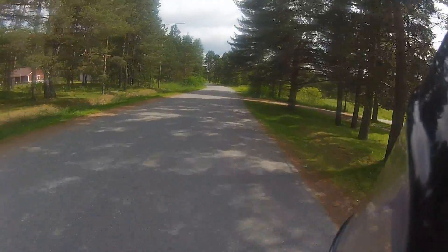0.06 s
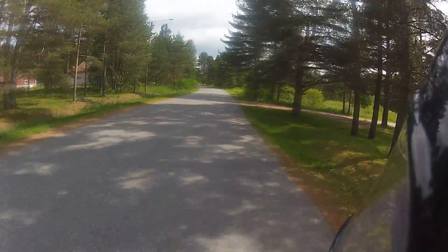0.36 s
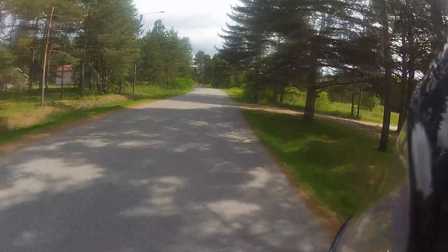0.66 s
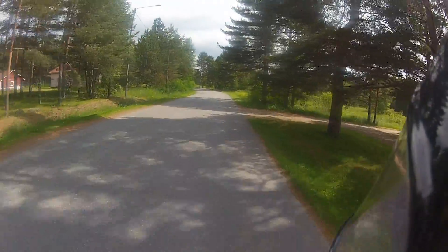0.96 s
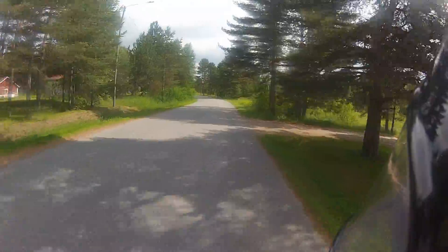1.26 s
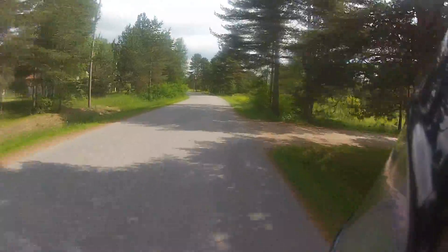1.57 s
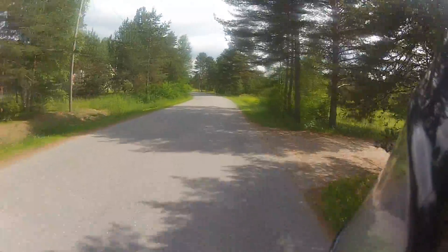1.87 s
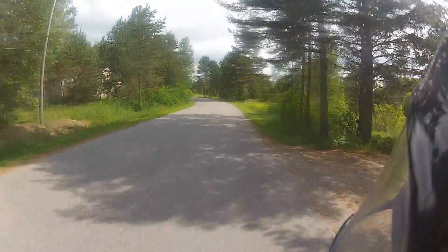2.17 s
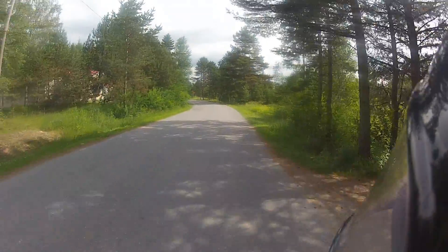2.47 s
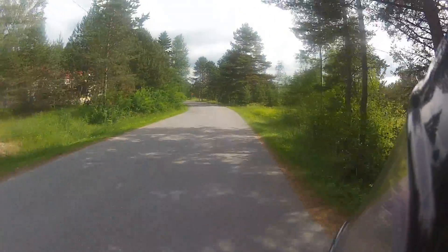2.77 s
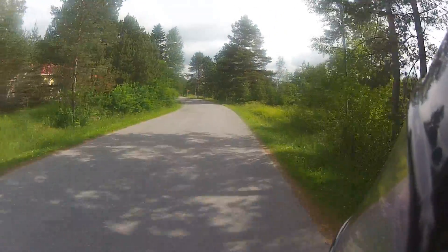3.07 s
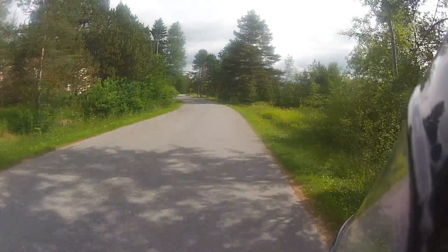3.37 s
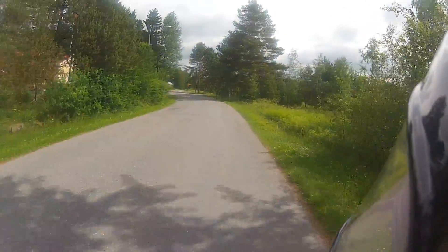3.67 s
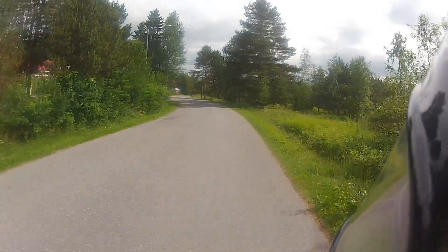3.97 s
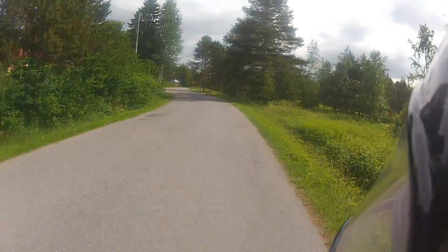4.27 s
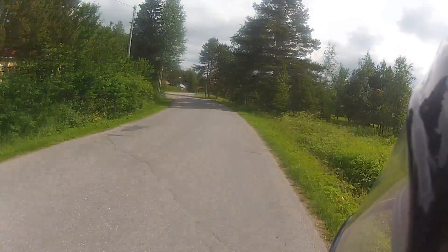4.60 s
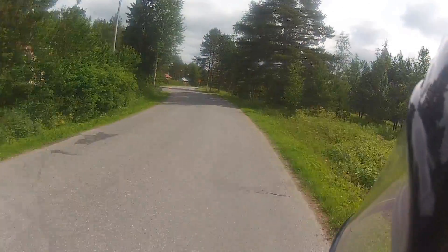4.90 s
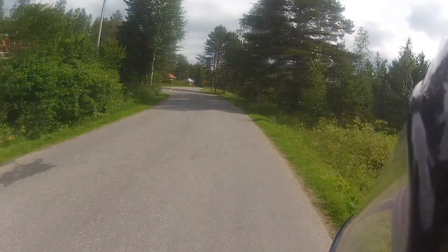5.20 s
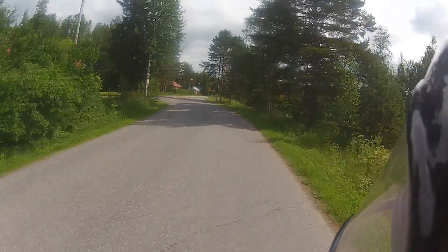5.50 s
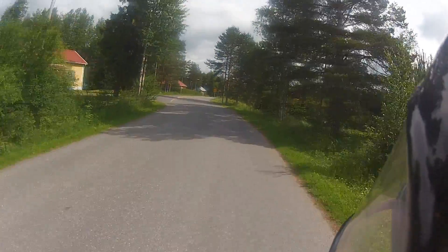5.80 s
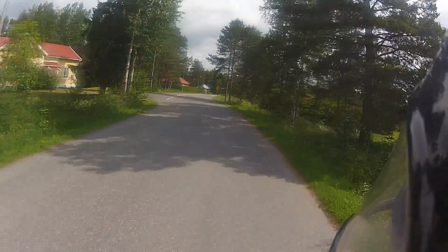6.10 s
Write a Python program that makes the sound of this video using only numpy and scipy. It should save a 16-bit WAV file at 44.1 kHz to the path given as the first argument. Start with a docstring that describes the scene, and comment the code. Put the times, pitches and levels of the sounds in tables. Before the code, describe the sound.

A small two-stroke moped cruises along a country road, heard close up from a microphone on the rider. Its engine holds a buzzy, nasal drone with a light metallic rasp, rising very slightly in pitch and then levelling off. Several times it stumbles for an instant, sags and pulls on again. Low, gusty wind rumbles underneath throughout, and a faint glassy fizz sits on top.

```python
"""Two-stroke moped on a country road

Heard from a small camera on the cruising rider. Each turn of the crank sends a pressure pulse down the
exhaust and excites the resonances of the crankcase, fins, air box and panels. Now and then the engine
misfires on alternate strokes, sags and pulls on. Turbulent wind rumbles underneath, and the camera's
coarse sampling mirrors the spectrum into the treble as a glassy fizz."""
import sys
import numpy as np
from scipy import signal
from scipy.fft import rfft, irfft
from scipy.io import wavfile
from scipy.ndimage import uniform_filter1d

SR = 44100
rng = np.random.default_rng(int(sys.argv[2]) if len(sys.argv) > 2 else 0)


def store_pcm(level_fs):
    """Save levels as 16-bit WAV."""
    pcm = np.round(np.clip(level_fs, -1, 1) * 32767).astype(np.int16)
    wavfile.write(sys.argv[1], SR, np.atleast_2d(pcm).T)


N = 275625
TIME = np.arange(N) / SR

# mean crank speed, climbing slowly and levelling off: time_s, speed_hz
CRANK_SPEED = [(0.0, 94.1), (0.8, 94.9), (1.3, 95.38), (1.6, 95.93), (1.95, 96.06), (2.4, 96.73),
               (3.0, 97.96), (3.45, 98.23), (3.8, 98.8), (4.05, 98.13), (4.3, 99.1), (4.65, 98.52),
               (4.9, 99.6), (5.15, 98.84), (5.45, 99.34), (5.8, 98.51), (6.25, 98.22)]
# bouts in which every other stroke fails to burn: start_s, length_s, gain_db
MISFIRE_BOUTS = [(0.478, .01, -4), (1.398, .01, -6), (1.983, .075, -9.5), (4.109, .05, -10),
                 (4.725, .01, -2), (5.04, .01, -7), (5.117, .03, -2), (5.897, .095, -9), (6.163, .05, -7.5)]
def firings(crank_hz, sag_turns_per_s=.9, hunt_turns=.016, hunt_db_per_hz=1.0, rebound=.55):
    """Two-stroke cycle: one firing per turn of the crank. Gives each one's time, period and strength."""
    # misfires hold the crank back, then it catches up
    sag = sum(sag_turns_per_s * length * bell(TIME - start - length, reach=.07)
              for start, length, _ in MISFIRE_BOUTS)
    # the crank hunts about its mean speed, more widely as it runs faster
    hunt = hunt_turns * undb(hunt_db_per_hz * (crank_hz - np.mean(crank_hz))) * waver(rate_hz=21)
    turns = np.cumsum(crank_hz) / SR - sag + hunt
    times = np.interp(np.arange(.5, turns[-1]), turns, TIME)
    misfire_db = np.zeros(len(times))
    for start, length, gain_db in MISFIRE_BOUTS:
        first = np.searchsorted(times, start) - 1  # the stroke already under way
        strokes = int(np.ceil(length * np.mean(crank_hz)))
        misfire_db[first:first + strokes:2] = gain_db
    burn_db = misfire_db - rebound * np.roll(misfire_db, 1)  # unburnt charge strengthens the next stroke
    burn_db += .25 * rng.standard_normal(640)[:len(times)]
    return times, 1 / np.interp(times, TIME, crank_hz), burn_db


# response of the exhaust pipe to one firing: frequency_hz, level_db
PIPE_RESPONSE = [(45, -26.5), (95, -10.5), (195, -5.5), (290, -12.5), (390, -9), (485, -3.5), (560, -1.5),
                 (610, -9.5), (685, 4.5), (735, -4.5), (785, -26), (890, -15.5), (1050, -29), (1500, -46.5)]
# resonances of the silencer chambers: pitch_hz, bandwidth_hz
SILENCER_MODES = [(280, 100), (450, 150), (520, 60)]
# spectrum of turbulent gas in the silencer: frequency_hz, level_db
GAS_SPECTRUM = [(150, -35), (300, -14.5), (450, -9.5), (610, -7), (700, 4), (770, -5), (870, -22.5),
                (1050, -32), (1400, -31), (2500, -42.5)]
def exhaust(times, burn_db, jitter_s=.00005, scatter_db=1.25, burn_share=.79, gas_db=-7):
    """Pipe resonance: the opening port releases a pressure pulse, and turbulent gas follows it."""
    timing, strength = rng.standard_normal((len(times), 2)).T
    openings = times + jitter_s * timing
    sizes = undb(burn_share * burn_db + scatter_db * strength)
    note = colour(pulses(openings, sizes), PIPE_RESPONSE)
    for hz, width in SILENCER_MODES:
        note = note - 2 * resonator(note, hz, width)  # all-pass: delays its band at the same level
    gas = colour(puffs(openings, sizes, decay_s=.026), GAS_SPECTRUM)
    return note + undb(gas_db) * gas


# brief changes in the engine's level, nearly all downward: centre_s, length_s, gain_db
LEVEL_DIPS = [(0.494, 0.046, -3.5), (1.415, 0.062, -6), (2.143, 0.065, -4.5), (3.236, 0.024, -7),
              (3.773, 0.026, 0.5), (4.115, 0.069, -6), (5.62, 0.052, -2.5)]
def dips():
    """Amplitude modulation: a gain in dB that makes the engine note dip briefly."""
    return sum(db * bell(TIME - centre, length / 2) for centre, length, db in LEVEL_DIPS)


# blows within one turn of the crank: delay_turns, relative_level_db
KNOCK_PATTERN = [(.05, 0), (.27, -.5), (.4, -8)]
def knocks(times, period, burn_db, jitter_s=.000015, scatter_db=.9):
    """Impact excitation: times and sizes of the blows of combustion and piston slap."""
    blows = np.concatenate([times + delay * period for delay, _ in KNOCK_PATTERN])
    level_db = np.concatenate([burn_db + db for _, db in KNOCK_PATTERN])
    timing, strength = rng.standard_normal((len(blows), 2)).T
    return blows + jitter_s * timing, undb(level_db + scatter_db * strength)


# modes of the crankcase and covers: pitch_hz, bandwidth_hz, relative_level_db
CASE_MODES = [(1865, 44, -4), (2060, 88, -3), (2245, 32, -4.5), (2668, 52, 2.5), (2945, 147, 1),
              (3038, 96, 1.5)]
def crankcase(blows, sizes, rasp_db=-5.5, whirr_db=-8.5):
    """Modal vibration: rasping knocks and the steady whirr of bearings and chain ring the case."""
    rasp = undb(rasp_db) * puffs(blows, sizes, decay_s=.0013)
    whirr = undb(whirr_db) * rng.standard_normal(N)
    return ring(unit(pulses(blows, sizes)) + rasp + whirr, CASE_MODES)


# modes of the cooling fins: pitch_hz, bandwidth_hz, relative_level_db
FIN_MODES = [(3475, 113, 0.5), (3950, 32, -8.5), (4365, 140, -12), (4715, 130, -5.5), (5146, 148, -8)]
def fins(blows, sizes, grit_db=-5, crack_db=-4, decay_s=.0009):
    """Damped ringing: the knocks set the fins buzzing, and their sharp edge is heard as a dry crack."""
    grit = undb(grit_db) * puffs(blows, sizes, decay_s)
    buzz = ring(unit(pulses(blows, sizes)) + grit, FIN_MODES)
    crack_spectrum = [(800, -9), (1900, 3.5), (2900, 5), (4100, -4.5), (5400, -15)]
    crack = colour(puffs(blows, sizes, decay_s), crack_spectrum)
    return buzz + undb(crack_db) * crack


# modes of thin panels: pitch_hz, bandwidth_hz, relative_level_db, best_crank_hz
PANEL_MODES = [(2098, 50, -34.5, 94.6), (2287, 30, -36, 94.6), (3030, 74, -32.5, 97.2)]
def panels(times, burn_db, crank_hz, burn_share=.82, reach_hz=1.2, swell_db=9.5):
    """Sympathetic vibration: firings shake the panels, and each swells near its own crank speed."""
    drive = pulses(times, undb(burn_share * burn_db))
    sound = np.zeros(N)
    for hz, width, db, best_hz in PANEL_MODES:
        nearness = bell(crank_hz - best_hz, reach_hz)
        sound += undb(db + swell_db * (nearness - 1.5)) * unit(resonator(drive, hz, width))
    return sound


# resonances of the air box: pitch_hz, bandwidth_hz, relative_level_db
AIRBOX_MODES = [(1030, 15, -0.5), (1191, 32, -3), (1386.5, 43, 2), (1590, 60, 0.5)]
def intake(times, period, delay_turns=.53, scatter_db=1.5, hiss_db=-9):
    """Cavity resonance: each hissing gulp of air rings the air box."""
    gulps = times + delay_turns * period
    sizes = undb(scatter_db * rng.standard_normal(len(gulps)))
    hiss = undb(hiss_db) * puffs(gulps, sizes, decay_s=.0018)
    return ring(unit(pulses(gulps, sizes)) + hiss, AIRBOX_MODES)


# strength of the air stream past the rider: time_s, level_db
WIND_LEVEL = [(0, -18), (0.6, -22), (1.5, -24), (3.2, -25.5), (4.2, -23.5), (5.2, -23), (6.0, -21),
              (6.25, -20.5)]
# spectrum of the buffeting round the camera: frequency_hz, level_db
BUFFET_SPECTRUM = [(15, -13), (30, -8), (65, -5.5), (140, -4.5), (260, -6), (450, -6), (750, -13),
                   (1100, -39), (3000, -17.5), (5500, -42)]
def wind(gust_db=1.34):
    """Turbulence: random pressure in the air stream makes a low, gusty rumble."""
    gusts = rng.standard_normal(N) * undb(gust_db * waver(rate_hz=12))
    return undb(curve(WIND_LEVEL)) * colour(gusts, BUFFET_SPECTRUM)


def pulses(times, sizes):
    """Impulse train: one click at each time, shared between two neighbouring samples."""
    place = np.clip(times * SR, 0, N)
    whole, part = place.astype(int), place % 1
    before = np.bincount(whole, sizes * (1 - part), N + 2)
    after = np.bincount(whole + 1, sizes * part, N + 2)
    return (before + after)[:N]


def puffs(times, sizes, decay_s):
    """Exponential decay: a burst of noise dies away after each time."""
    envelope = signal.lfilter([1], [1, -np.exp(-1 / (decay_s * SR))], pulses(times, sizes))
    return unit(envelope * rng.standard_normal(N))


def resonator(x, hz, width_hz):
    """Forced response of one damped oscillator."""
    return signal.lfilter(*signal.iirpeak(hz, hz / width_hz, fs=SR), x)


def ring(x, modes):
    """Superposition of modes; neighbours swing in opposite directions."""
    return unit(sum((-1) ** k * undb(db) * resonator(x, hz, width)
                    for k, (hz, width, db) in enumerate(modes)))


def colour(x, spectrum, size=8192):
    """Minimum-phase filtering by a spectrum of frequency_hz, level_db points."""
    hz, db = np.transpose(spectrum)
    freq = np.maximum(np.fft.rfftfreq(size, 1 / SR), 1)
    gain = undb(np.interp(np.log(freq), np.log(hz), db))
    cepstrum = irfft(np.log(gain))
    cepstrum[1:size // 2] *= 2  # folding the cepstrum makes the filter causal
    cepstrum[size // 2 + 1:] = 0
    impulse_response = irfft(np.exp(rfft(cepstrum)))
    return unit(signal.fftconvolve(x, impulse_response)[:N])


def waver(rate_hz):
    """Slow fluctuation: random steps, smoothed twice, at rms 1."""
    hold = int(SR / rate_hz)
    steps = np.repeat(rng.standard_normal(N // hold + 1), hold)
    return unit(uniform_filter1d(uniform_filter1d(steps, hold), hold)[:N])


def curve(table):
    """Linear interpolation of a timed table at every sample."""
    return np.interp(TIME, *np.transpose(table))


def bell(offset, reach):
    """Gaussian curve: 1 at no offset, 1 / e at the given reach."""
    return np.exp(-(offset / reach) ** 2)


def undb(db):
    """Decibels to gain."""
    return 10 ** (np.asarray(db) / 20)


def unit(x):
    """Scale to rms 1."""
    return x / np.sqrt(np.mean(x ** 2))


def scene(split_hz=260, note_db_per_hz=-.27, body_dip_share=.55):
    """Superposition: engine and wind add at a single microphone."""
    crank_hz = curve(CRANK_SPEED)
    times, period, burn_db = firings(crank_hz)
    blows, sizes = knocks(times, period, burn_db)
    pipe = exhaust(times, burn_db)
    # the low throb follows the gas flow and is steadier than the note above it
    throb = signal.sosfiltfilt(signal.butter(4, split_hz, fs=SR, output="sos"), pipe)
    note = pipe - throb
    speed_db = note_db_per_hz * (crank_hz - np.mean(crank_hz))  # quieter as the crank speeds up
    dip_db = dips()
    # unsteady burning makes both levels waver
    note_db = -15 + speed_db + dip_db + waver(rate_hz=55)
    body_db = body_dip_share * dip_db + 1.25 * waver(rate_hz=12)
    metal = undb(-29) * crankcase(blows, sizes) + undb(-33) * fins(blows, sizes)
    body = undb(-24.5) * unit(throb) + metal + panels(times, burn_db, crank_hz)
    body += undb(-41) * intake(times, period)
    mono = undb(note_db) * note + undb(body_db) * body + wind()
    return np.array([mono, mono])


def record(dry, ceiling=.92, band_hz=5650, rate_hz=12000, top_hz=15250):
    """Saturation and spectral imaging: the camera rounds the peaks, samples slowly, holds each value."""
    sound = signal.sosfilt(signal.butter(2, 15, "high", fs=SR, output="sos"), dry)
    rounded = sound / (1 + (sound / ceiling) ** 4) ** (1 / 4)
    band = signal.sosfilt(signal.butter(20, band_hz, fs=SR, output="sos"), rounded)
    mirrored = band * (1 + 2 * np.cos(2 * np.pi * rate_hz * TIME))  # images either side of rate_hz
    hold_response = np.sinc(np.fft.rfftfreq(2 * N, 1 / SR) / rate_hz)
    held = irfft(rfft(mirrored, 2 * N) * hold_response)[:, :N]
    return signal.sosfilt(signal.ellip(14, .2, 80, top_hz, fs=SR, output="sos"), held)


dry = scene()
out = record(dry)
store_pcm(out)
```